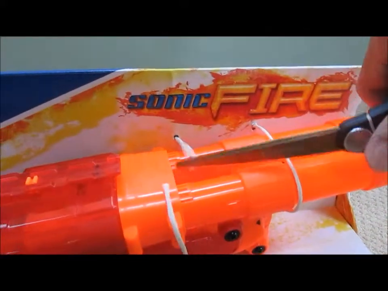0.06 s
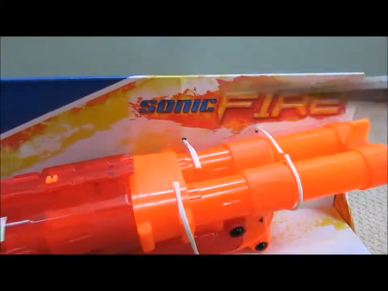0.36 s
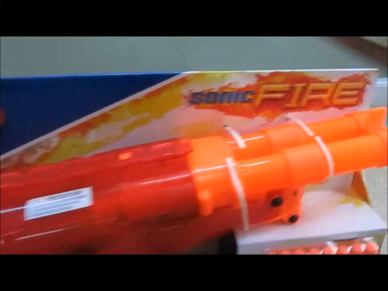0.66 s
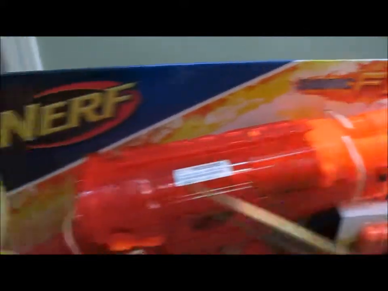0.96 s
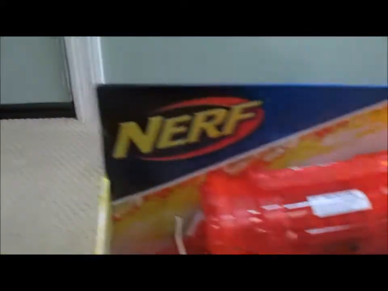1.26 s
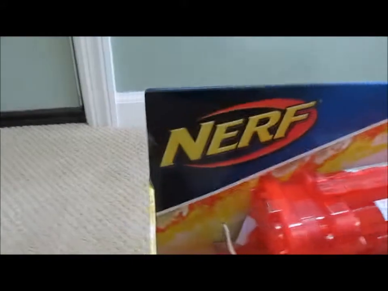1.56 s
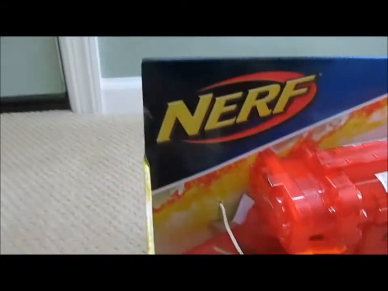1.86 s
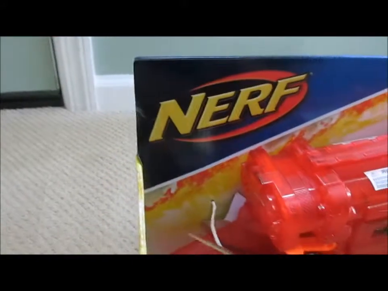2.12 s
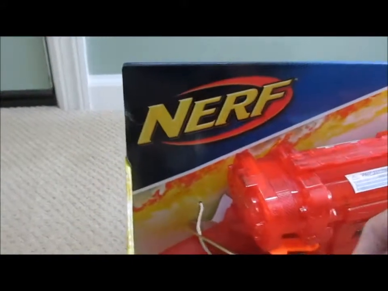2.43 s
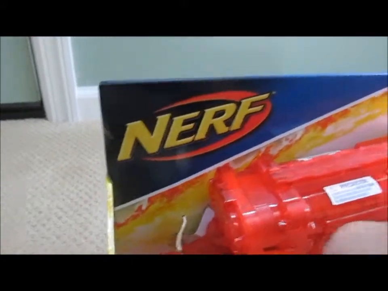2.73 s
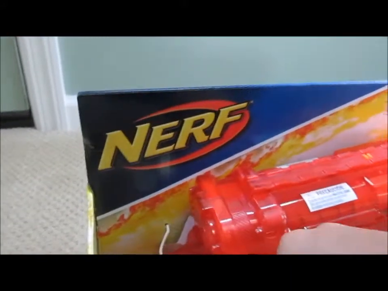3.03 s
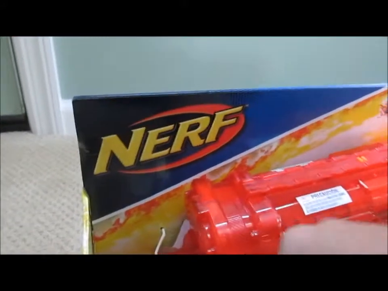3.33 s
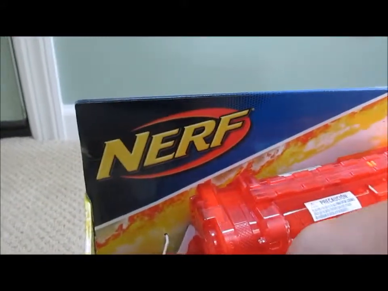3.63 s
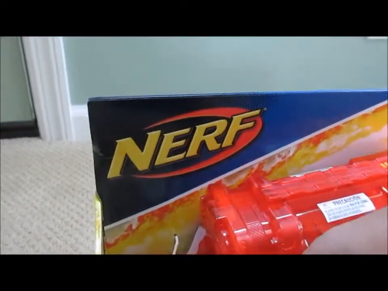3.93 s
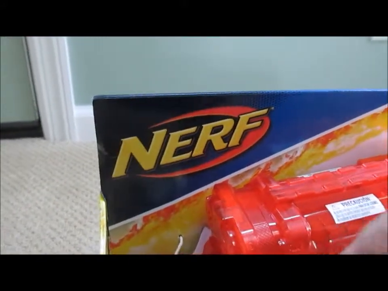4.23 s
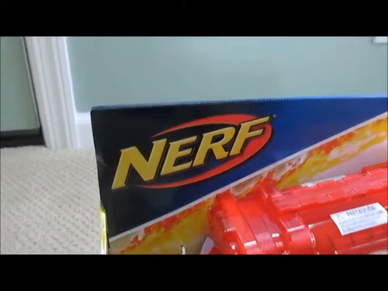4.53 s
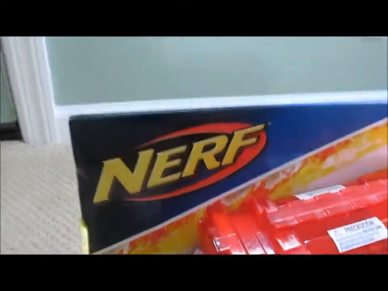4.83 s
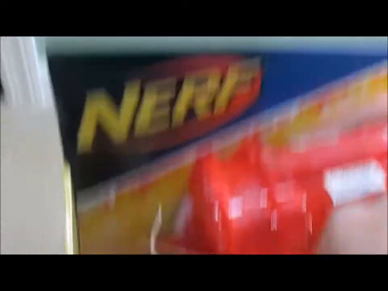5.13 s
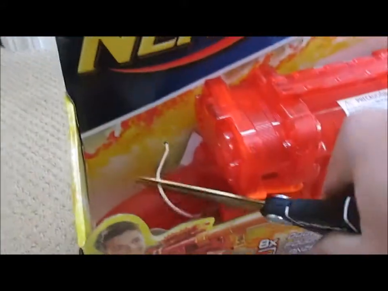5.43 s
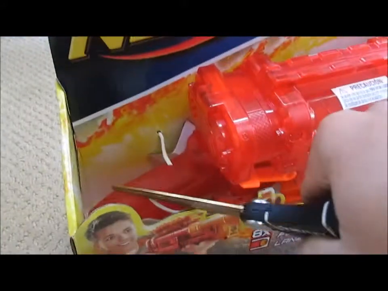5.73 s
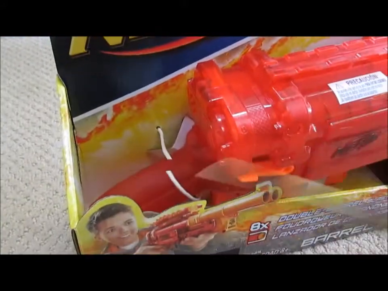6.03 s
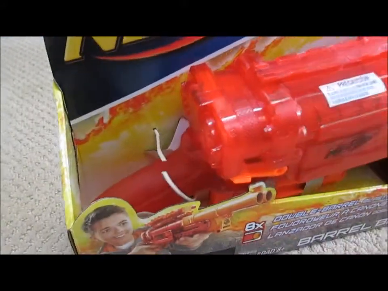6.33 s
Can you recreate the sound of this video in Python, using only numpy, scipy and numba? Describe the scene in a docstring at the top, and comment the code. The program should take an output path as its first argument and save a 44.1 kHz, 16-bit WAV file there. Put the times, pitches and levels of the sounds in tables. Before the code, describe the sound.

Close handling noise and light plastic ticks over a faint room hum, then one loud scissor snip through a plastic tie.

```python
"""Scissors snipping plastic ties

In a quiet carpeted room, scissors cut the ties of a boxed toy: each fracture excites the modes of
blades and handles. Between two snips the blades swish shut once, and fingers shift on a hand-held
camera, driving its case by friction and impact: rubbing, knocks, ticks and a squeak. A snip overloads
the microphone and ducks the gain, so the room's hum creeps back afterwards."""
import sys
import numpy as np
from scipy import signal
from scipy.fft import rfft, irfft
from scipy.io import wavfile
from scipy.ndimage import uniform_filter1d
from numba import njit

SR = 44100
rng = np.random.default_rng(int(sys.argv[2]) if len(sys.argv) > 2 else 0)


def transcribe(u):
    """Save the signal u as a 16-bit wav file named by the first command-line argument.

    u: samples, shape (n,) or (channels, n), limited to [-1, 1]; the rate is SR.
    q: integer samples, one column per channel.
    """
    v = np.clip(np.atleast_2d(u).T, -1, 1)
    q = np.round(v * 32767).astype(np.int16)
    wavfile.write(sys.argv[1], SR, q)


N = 280917
TIME = np.arange(N) / SR


def undb(db):
    """Amplitude ratio of a level in decibels."""
    return 10 ** (np.asarray(db) / 20)


def unit(x):
    """Normalisation to rms 1."""
    return x / np.sqrt(np.mean(x ** 2))


def burst(x, db):
    """Equal energy: scale a short stereo sound to match 10 ms at this rms level."""
    return x * undb(db) / np.sqrt(np.sum(x ** 2) / 2 / (SR // 100))


def add(out, start_s, x):
    """Superposition of a sound at a given time."""
    i = int(round(start_s * SR))
    a, b = max(i, 0), min(i + x.shape[-1], N)
    out[:, a:b] += x[..., a - i:b - i]


def colour(x, points, size=4096):
    """Minimum-phase filter through (frequency_hz, gain_db) points, by folding the cepstrum."""
    hz, db = np.transpose(points)
    grid = np.maximum(np.fft.rfftfreq(size, 1 / SR), 1)
    gain = undb(np.interp(np.log(grid), np.log(hz), db))
    cepstrum = irfft(np.log(gain))
    cepstrum[1:size // 2] *= 2
    cepstrum[size // 2 + 1:] = 0
    response = irfft(np.exp(rfft(cepstrum)))
    return signal.fftconvolve(x, response[None], axes=1)[:, :x.shape[1]]


def band(x, low_hz, high_hz):
    """Band-pass filter."""
    return signal.sosfilt(signal.butter(2, [low_hz, high_hz], "band", fs=SR, output="sos"), x)


def ring(x, modes, ratio=1, order=1):
    """Forced response of damped modes; order 2 softens the attack and steepens each mode's skirts."""
    out = 0
    for hz, width, db in modes:
        section = np.concatenate(signal.iirpeak(hz * ratio, hz / width, SR))
        out = out + undb(db) * signal.sosfilt([section] * order, x + 1e-18)
    return out


def noise(size, side):
    """Partly coherent stereo noise; side weights the part that differs between channels."""
    common, differing = rng.standard_normal((2, size))
    return unit(np.array([common + side * differing, common - side * differing]))


def drift(rate_hz):
    """Smooth random fluctuation of rms 1."""
    k = int(SR / rate_hz)
    steps = np.repeat(rng.standard_normal(N // k + 1), k)
    return unit(uniform_filter1d(uniform_filter1d(steps, k), k)[:N])


def swell(start_s, attack_s, hold_s, release_s):
    """Envelope of a slide: linear rise, plateau, exponential decay."""
    t = TIME - start_s
    return np.clip(t / attack_s, 0, 1) * np.exp(-np.maximum(t - attack_s - hold_s, 0) / release_s)


# Spectrum of the ventilation: frequency_hz, gain_db
VENT_COLOUR = [(20, -16), (45, -9), (72, -5), (120, -7), (200, -9), (300, -16), (420, -21), (750, -24),
               (1100, -26), (2100, -35), (4000, -37), (6000, -35), (10000, -42), (15500, -43)]
# Tones of an appliance: pitch_hz, level_db
HUM_TONES = [(72.7, -52), (120, -67)]


def room_tone():
    """Background noise: broadband ventilation, and a hum modulated in amplitude and phase."""
    air = unit(colour(noise(N, side=.85), VENT_COLOUR)) * undb(-50.7 + .7 * drift(6))
    hum = sum(undb(db + drift(5)) * np.sqrt(2) * np.sin(2 * np.pi * hz * TIME + .25 * drift(4))
              for hz, db in HUM_TONES)
    return air + hum


# Spectrum of the room's reflections: frequency_hz, gain_db
REVERB_COLOUR = [(100, -7), (220, -1), (450, 1), (700, -1), (1000, 3), (2000, -4), (3500, -5), (5800, 1.5),
                 (9000, -5), (15000, -11)]


def reverberation(t60_low_s, t60_high_s, split_hz):
    """Impulse response of a diffuse field: exponential decay, faster in the treble."""
    t = TIME[:SR * 3 // 5]
    field = colour(noise(len(t), side=.8), REVERB_COLOUR)
    low = signal.sosfilt(signal.butter(1, split_hz, fs=SR, output="sos"), field)
    tail = low * undb(-60 * t / t60_low_s) + (field - low) * undb(-60 * t / t60_high_s)
    tail *= np.clip(t / .006, 0, 1)
    return tail / np.sqrt(np.sum(tail ** 2) / 2)


# Firmness of the hand on the camera, as the level of its rumble: time_s, level_db
GRIP_LEVELS = [(0, -72), (1.5, -64), (2.1, -56), (3.3, -56), (3.55, -57), (4.5, -53), (5.2, -53),
               (5.5, -52), (5.6, -62), (6.37, -66)]


def grip():
    """Structure-borne sound: the amplitude of the rumble follows the firmness of the hand."""
    return undb(np.interp(TIME, *np.transpose(GRIP_LEVELS)))


def creaks(rate_hz=60, decay_s=.0015):
    """Random impulse train: the seams of the case click, more strongly under a firm grip."""
    clicks = (rng.random(N) < rate_hz / SR) * undb(2.5 * rng.standard_normal(N))
    envelope = signal.lfilter([1], [1, -np.exp(-1 / (decay_s * SR))], clicks + 1e-18)
    return unit(band(envelope * noise(N, side=.4), 330, 1300)) * grip() * undb(-11)


# Resonances of the plastic camera case: pitch_hz, bandwidth_hz, gain_db
CASE_MODES = [(465, 100, -3.5), (585, 65, -4), (1010, 150, -3.5), (1140, 130, 1.2), (1350, 140, -9),
              (1690, 160, -8), (1900, 120, -14), (2400, 400, -23), (3080, 220, -22), (3480, 200, -24),
              (5400, 350, -29), (6120, 350, -26)]


def case(force, ratio=1):
    """Modal response of the case, heavily damped by the hand."""
    return ring(force, CASE_MODES, ratio, order=2)


# Spectrum of skin sliding on plastic: frequency_hz, gain_db
SKIN_COLOUR = [(900, -25), (2000, -6), (3100, -1), (4200, -5), (6200, 3), (8000, -5), (10500, -8),
               (12500, -4.5), (15500, -9)]
# Finger strokes over the case: centre_s, length_s, hiss_gain_db, ring_gain_db
FINGER_STROKES = [(1.752, .035, -68, -46), (1.86, .18, -69, -52), (1.98, .13, -59, -51),
                  (2.065, .05, -59, -44), (2.16, .16, -53, -42.5), (2.29, .1, -56, -49),
                  (2.58, .06, -57, -51), (2.66, .08, -62, -63), (2.755, .1, -55, -49),
                  (2.895, .05, -54, -54), (3.06, .16, -61, -57), (3.415, .045, -57, -38.5),
                  (3.46, .06, -62, -45), (3.52, .08, -66, -52), (3.77, .07, -64, -60),
                  (3.875, .05, -55, -49), (3.99, .06, -52, -48), (4.14, .07, -52, -45),
                  (4.24, .045, -63, -49), (4.29, .035, -53, -51), (4.402, .05, -53, -44),
                  (4.455, .06, -63, -45), (4.567, .06, -56, -47), (4.71, .04, -63, -59),
                  (4.945, .04, -61, -49), (5.17, .1, -63, -60)]


def rubbing():
    """Sliding friction: finger strokes and the creeping grip hiss, ring the case and flex its wall."""
    hold = grip()
    hiss_power = ring_power = 0
    for centre_s, length_s, hiss_db, ring_db in FINGER_STROKES:
        bell = np.exp(-(2 * (TIME - centre_s) / length_s) ** 2)  # speeds up, then slows
        hiss_power += bell * undb(hiss_db) ** 2
        ring_power += bell * undb(ring_db) ** 2
    sliding, pressing = np.sqrt(hiss_power), np.sqrt(ring_power)
    drag = undb(2.2 * drift(80) + 3.5 * drift(700))
    modal = case(noise(N, side=.22) * drag)
    body = unit(modal + undb(-14) * band(noise(N, side=.25) * drag, 300, 1300))
    hiss = unit(colour(noise(N, side=.9) * drag ** .4, SKIN_COLOUR))
    flex = unit(band(noise(N, side=.35) * undb(2 * drift(40)), 115, 330))
    rumble = unit(band(noise(N, side=.45), 22, 95))
    # strokes and grip add in power
    return (body * np.hypot(pressing * undb(-.5), hold * undb(-16))
            + hiss * np.hypot(sliding * undb(1.5), hold * undb(-16))
            + flex * np.hypot(pressing, hold * undb(-1))
            + rumble * hold)


# Finger impacts on the case: time_s, ring_db, scuff_s, pitch_ratio, thump_db, grit_db
FINGER_KNOCKS = [(0.777, -47, .0015, .6, -45, -60), (1.7075, -27.5, .001, 1.07, -36, -52),
                 (1.722, -35, .006, 1.1, -37, -58), (1.808, -38, .004, 1, -58, -64),
                 (2.279, -43, .006, .95, -45, -60), (2.313, -40, .003, 1, -60, -59),
                 (2.341, -32, .005, 1.1, -52, -43), (2.3485, -31, .003, 1.1, -32, -50),
                 (2.486, -43, .004, 1.05, -49, -64), (2.564, -42, .003, 1.05, -56, -48),
                 (2.604, -47, .003, 1, -38, -61), (2.721, -43, .007, .9, -42, -55),
                 (2.841, -48, .002, 1.2, -46, -62), (2.926, -45, .002, .9, -43, -62),
                 (3.028, -48, .004, .6, -53, -58), (3.38, -27, .002, 1.45, -50, -40),
                 (3.3845, -15.8, .002, .97, -42, -31), (3.799, -45, .006, 1, -52, -64),
                 (4.097, -44, .003, .9, -46, -55), (4.123, -38, .0012, 1.05, -41, -50),
                 (4.632, -38, .006, 1.02, -42, -62), (4.936, -38, .003, .95, -49, -57),
                 (4.95, -41, .003, .6, -37, -60), (5.254, -39, .0015, 1.02, -43, -60),
                 (5.359, -47, .001, 1, -56, -56), (5.449, -45, .003, 1, -46, -58),
                 (5.476, -34, .004, 1.04, -31, -50)]


def knocks():
    """Impact excitation: the case rings, its wall thumps, skin adds grit and the camera shakes."""
    out, lead = np.zeros((2, N)), SR // 50
    t = TIME[:SR // 7] - lead / SR
    for time_s, ring_db, scuff_s, ratio, thump_db, grit_db in FINGER_KNOCKS:
        contact = np.exp(-np.abs(t) / np.where(t < 0, .7 * scuff_s, scuff_s))
        force = .8 * contact * noise(len(t), side=.22) / np.sqrt(scuff_s * SR)
        force[:, lead] += .95  # the finger lands
        force += (t > 0) * np.exp(-np.abs(t) / .02) * noise(len(t), side=.3) * undb(-42)  # grip settles
        body = burst(case(force, ratio), ring_db)
        thump = burst(band(force, 110, 280), thump_db)
        scuff = band(contact * noise(len(t), side=.8), 1500, 11000)
        grit = burst(colour(scuff, SKIN_COLOUR), grit_db)
        shake = (t > 0) * np.exp(-t / .03) * noise(len(t), side=.2)
        jolt = burst(band(shake, 22, 80), ring_db - 17)
        add(out, time_s - lead / SR - .0015, body + thump + grit + jolt)
    return out


def squeak(start_s=2.001, attack_s=.018, slip_hz=572, squeal_hz=3020):
    """Stick-slip: a fingertip drives the case at harmonics of its slip rate; a thin squeal lingers."""
    cycles = np.cumsum(slip_hz * (1 + .05 * drift(500))) / SR
    slips = np.diff(np.floor(cycles), prepend=0) * undb(2.5 * drift(600))
    pressure = swell(start_s, attack_s, hold_s=.012, release_s=.0035)
    force = (slips + .05 * noise(N, side=.3)) * pressure
    body = burst(case(force), -21.5) + burst(band(force, 600, 1000), -26.5)
    scrape = band(force * noise(N, side=.7), 2000, 12000)
    rasp = burst(colour(scrape, SKIN_COLOUR), -36)
    squeal = unit(ring(noise(N, side=.4), [(squeal_hz, 200, 0)], order=2))
    return body + rasp + squeal * undb(-57) * swell(start_s, attack_s, hold_s=.11, release_s=.06)


# Contacts of plastic and steel: start_s, peak_db
HARD_CONTACTS = [(0.43, -38), (0.572, -41), (0.771, -32), (1.141, -33), (1.267, -41), (2.7765, -16),
                 (2.986, -37), (3.511, -30), (3.8425, -38), (3.88, -24), (4.032, -33), (4.315, -21),
                 (5.1235, -30), (5.501, -25.5), (5.795, -26), (6.019, -41), (6.191, -36)]
# Spectrum of a tick: frequency_hz, gain_db
TICK_COLOUR = [(400, -16), (1500, 1), (2700, 1.5), (4200, -1), (6500, 3), (10000, -2), (15500, -1)]


def ticks(decay_s=.0013):
    """Hard contact: a force lasting a few milliseconds has a broad spectrum."""
    out, t = np.zeros((2, N)), TIME[:SR // 25]
    for start_s, peak_db in HARD_CONTACTS:
        tick = colour(noise(len(t), side=.8) * np.exp(-t / decay_s), TICK_COLOUR)
        add(out, start_s, tick * undb(peak_db) / np.abs(tick).max())
    return out


# Resonances of the parting blades: pitch_hz, bandwidth_hz, gain_db
PING_MODES = [(764, 75, -2), (1790, 60, -2), (2980, 160, 0), (5610, 80, -2), (8600, 60, -10)]


def reopen(start_s=5.797, level_db=-40):
    """Free vibration: the blades come unstuck after the cut with a small ping."""
    out, t = np.zeros((2, N)), TIME[:SR // 12]
    force = noise(len(t), side=.6) * np.exp(-t / .002)
    add(out, start_s, burst(ring(force, PING_MODES), level_db))
    return out


# Spectrum of steel sliding on steel: frequency_hz, gain_db
SWISH_COLOUR = [(800, -26), (1550, 2), (2200, -4), (3000, -9), (5600, -8.5), (6400, 3), (7700, -6),
                (8500, 2), (10000, -7), (12000, 0.5), (15500, -7)]
# Resonances of the sliding blades: pitch_hz, bandwidth_hz, gain_db
BLADE_MODES = [(1550, 54, -1), (2200, 45, 1), (6400, 70, 0), (8500, 130, -3), (11700, 60, 0),
               (12300, 150, -2)]


def swish():
    """Friction noise: blade grinds along blade in tiny catches that excite the steel's modes."""
    grind = noise(N, side=1.3) * undb(3 * drift(900))
    steel = unit(colour(grind, SWISH_COLOUR)) + undb(-8) * unit(ring(grind, BLADE_MODES))
    return steel * undb(-34) * swell(start_s=.882, attack_s=.024, hold_s=.021, release_s=.006)


# Cuts; the first falls just before time zero and leaves only its reverberation: start_s, gain_db
CUTS = [(-0.068, 3), (5.5177, 3)]
# Force pulses as the tie parts, the blades slide and the handles meet: delay_s, gain_db, decay_s
CUT_STAGES = [(0, -0.5, .0014), (.0014, -4.5, .0035), (.0047, -1.5, .0012)]
# Resonances of handles and blades: pitch_hz, bandwidth_hz, gain_db
SCISSOR_MODES = [(455, 170, 3), (960, 110, 1), (1150, 93, 1), (1750, 400, -2), (2530, 120, -1),
                 (4290, 89, -7), (5280, 120, -2), (5820, 100, 0), (6230, 130, 1), (7120, 98, -3),
                 (8140, 100, -3), (8710, 110, -4), (9910, 200, -8), (11800, 170, -8.5), (12300, 290, -7.5),
                 (14500, 400, -9)]


def snips(room, split_hz=3000):
    """Fracture: the tie gives way with a pop and a crack, the scissors ring, the room reverberates."""
    out, t = np.zeros((2, N)), TIME[:SR // 10]
    handle_modes = [mode for mode in SCISSOR_MODES if mode[0] < split_hz]
    steel_modes = [mode for mode in SCISSOR_MODES if mode[0] >= split_hz]
    force = sum(undb(db) * (t >= delay_s) * np.exp(-np.abs(t - delay_s) / decay_s)
                for delay_s, db, decay_s in CUT_STAGES)
    pop = burst(np.sin(2 * np.pi * 400 * t) * np.exp(-t / .0007), -16)
    for start_s, gain_db in CUTS:
        low = band(noise(len(t), side=.15), 150, 3000) * undb(-2.5)
        high = band(noise(len(t), side=1), 2200, 16000)
        crack = force * (low + high)
        handles = burst(ring(crack, handle_modes), -5.3)
        steel = burst(ring(crack, steel_modes), -4)
        add(out, start_s, undb(gain_db) * (handles + steel + burst(crack, -6.5) + pop))
        add(out, start_s, burst(room, gain_db - 14))
    return out


def scene():
    """Superposition: airborne sounds reach the walls; structure-borne handling stays dry."""
    room = reverberation(t60_low_s=.47, t60_high_s=.36, split_hz=6000)
    airborne = swish() + ticks() + reopen()
    reflected = undb(-15.5) * signal.fftconvolve(airborne, room, axes=1)[:, :N]
    return snips(room) + airborne + reflected + knocks() + squeak() + rubbing() + creaks() + room_tone()


@njit
def ducking(over_db, start_db, attack_s, release_db_per_s):
    """Peak detection: the gain reduction in dB follows an overload quickly and recovers steadily."""
    out, held, duck = np.empty(len(over_db)), start_db, start_db
    for i in range(len(over_db)):
        held = max(over_db[i], held - release_db_per_s / SR, 0.)
        duck += (held - duck) / (attack_s * SR)
        out[i] = duck
    return out


def record(dry):
    """Automatic gain control, starting ducked by the first snip, then clipping and a low-pass."""
    threshold_db, cutoff_hz = -3.5, 16000
    over_db = 20 * np.log10(np.abs(dry).max(axis=0) + 1e-9) - threshold_db
    duck_db = ducking(over_db, start_db=18.0, attack_s=.0016, release_db_per_s=11.0)
    clipped = np.clip(dry * undb(-duck_db), -1, 1)
    return signal.sosfilt(signal.ellip(8, .2, 70, cutoff_hz, fs=SR, output="sos"), clipped)


dry = scene()
out = record(dry)
transcribe(out)
```